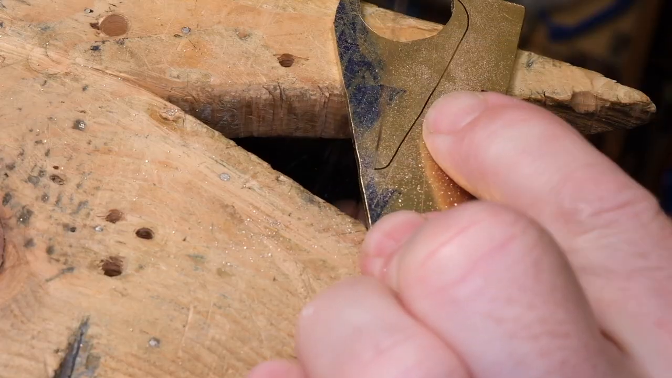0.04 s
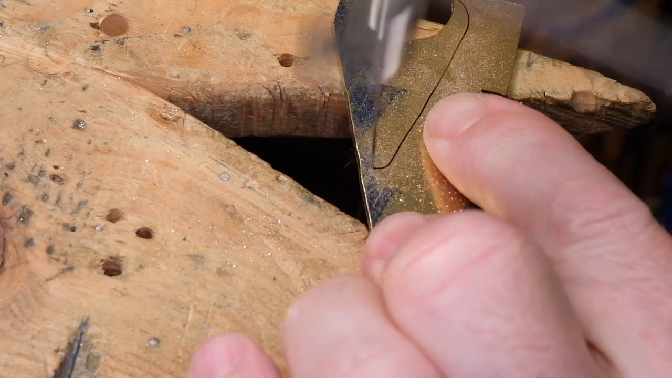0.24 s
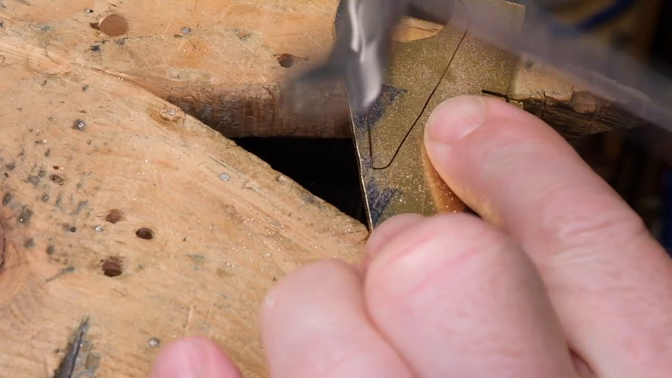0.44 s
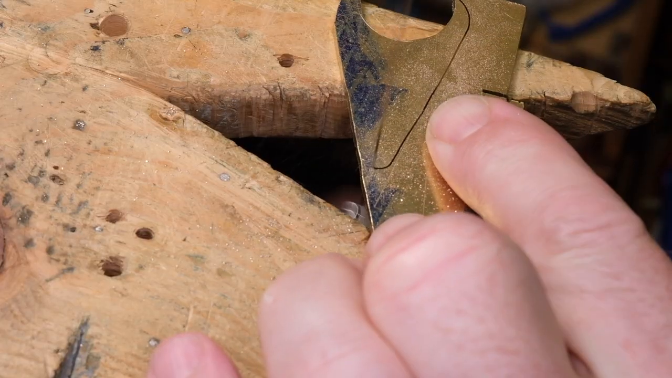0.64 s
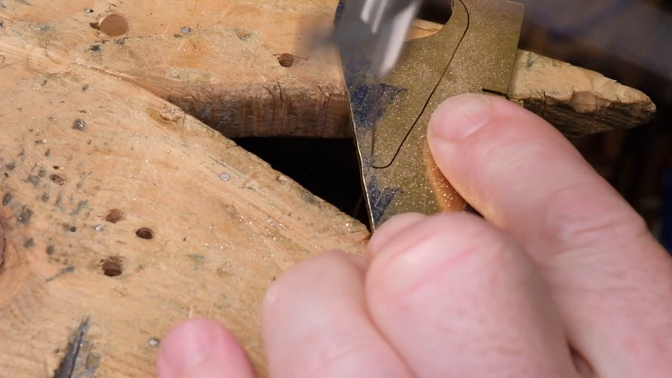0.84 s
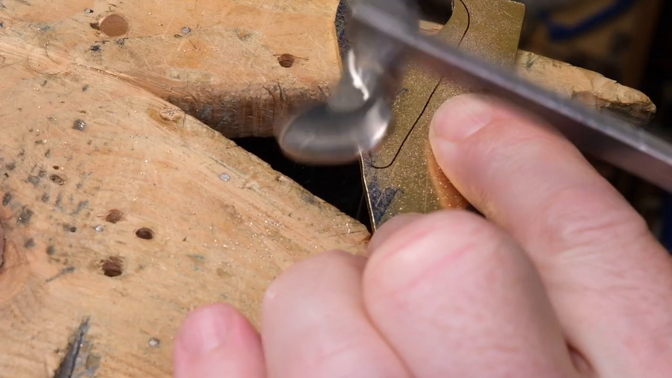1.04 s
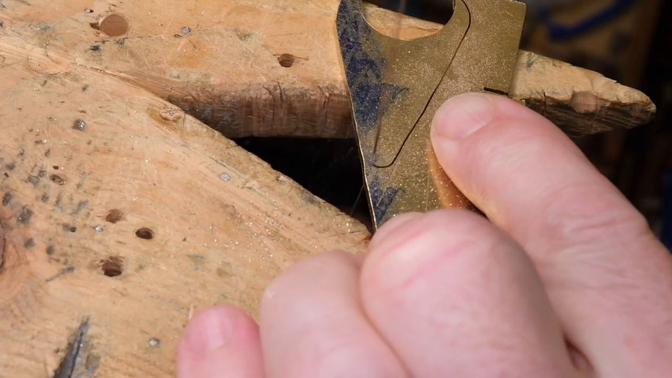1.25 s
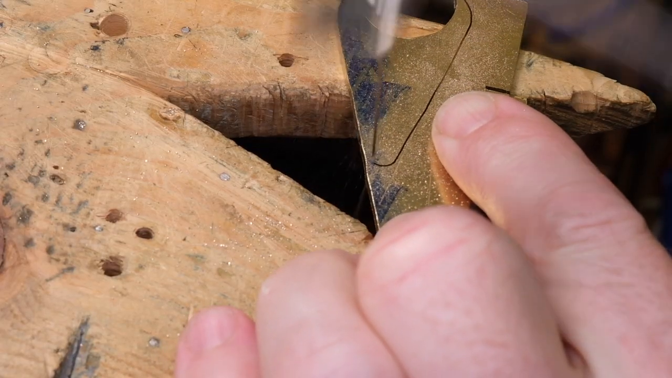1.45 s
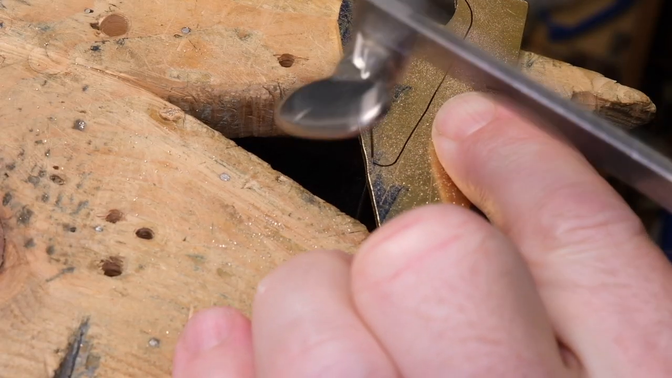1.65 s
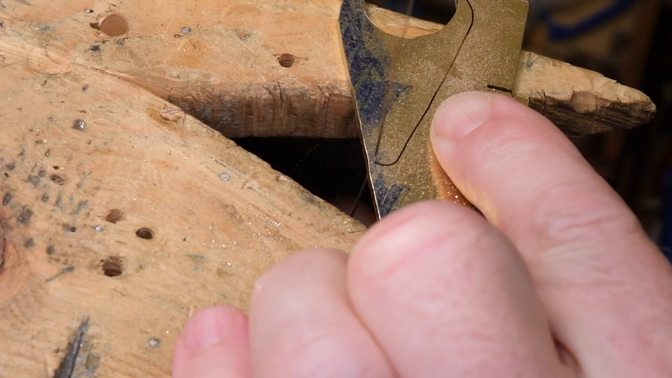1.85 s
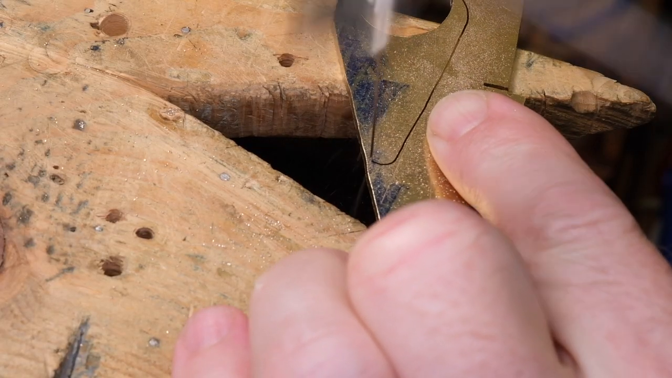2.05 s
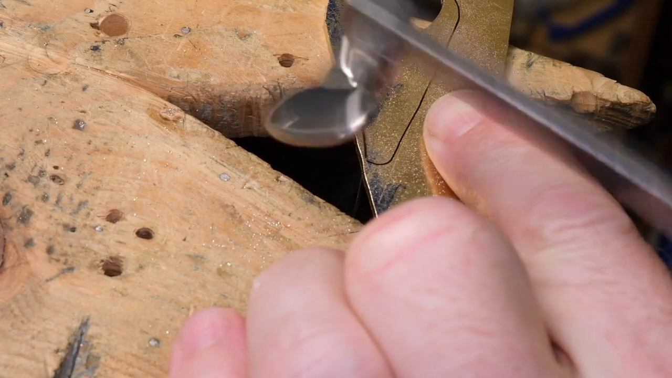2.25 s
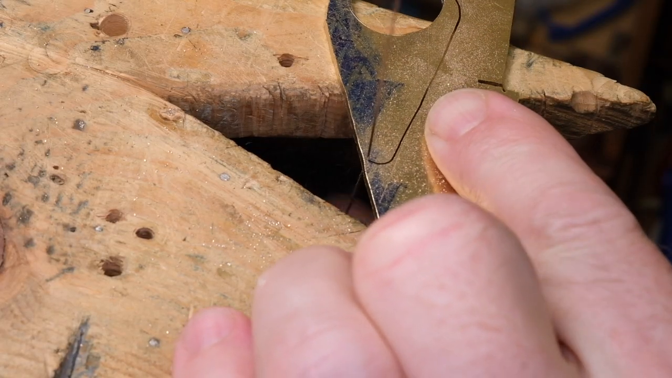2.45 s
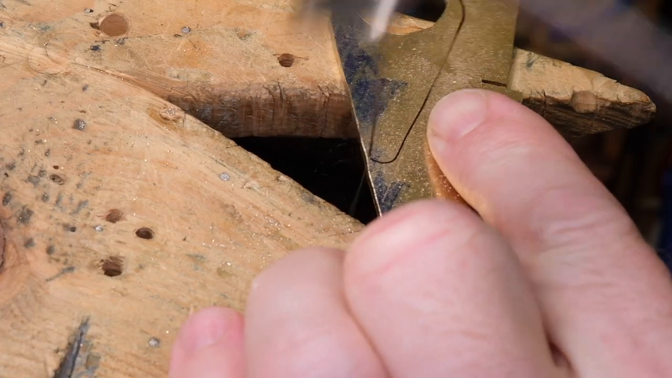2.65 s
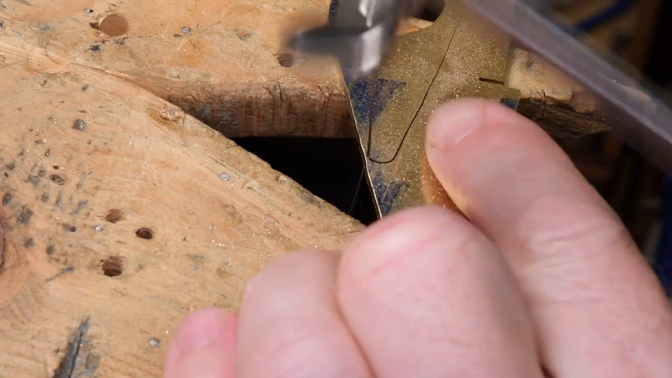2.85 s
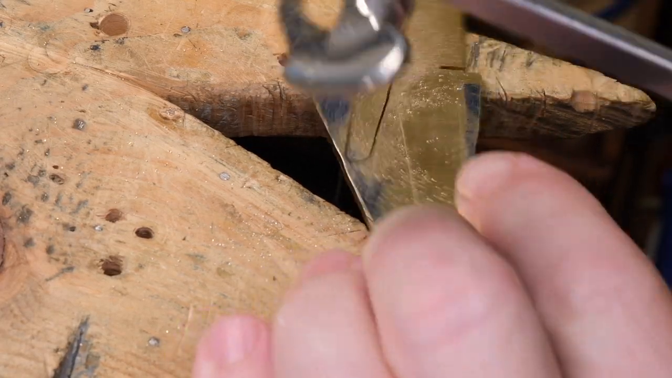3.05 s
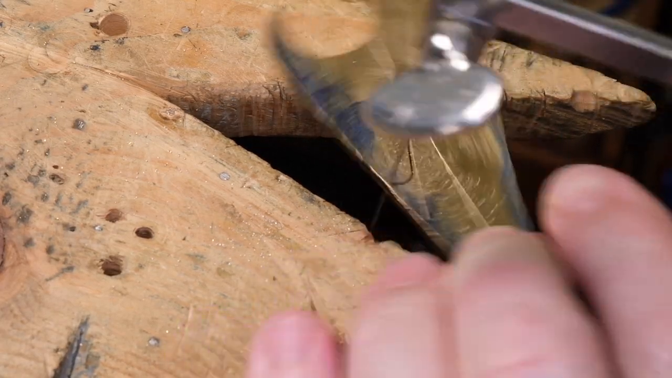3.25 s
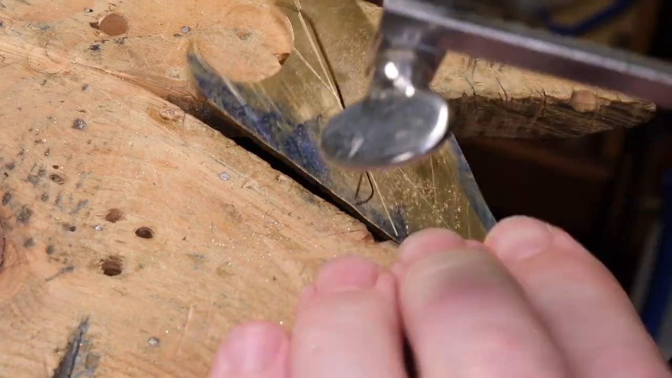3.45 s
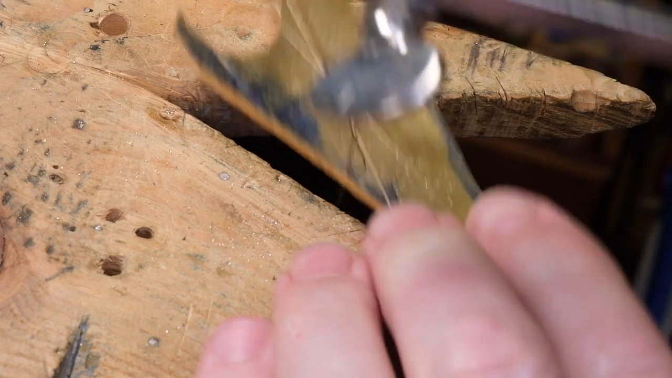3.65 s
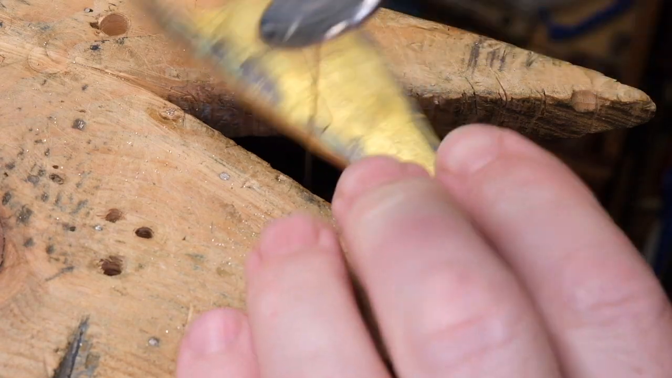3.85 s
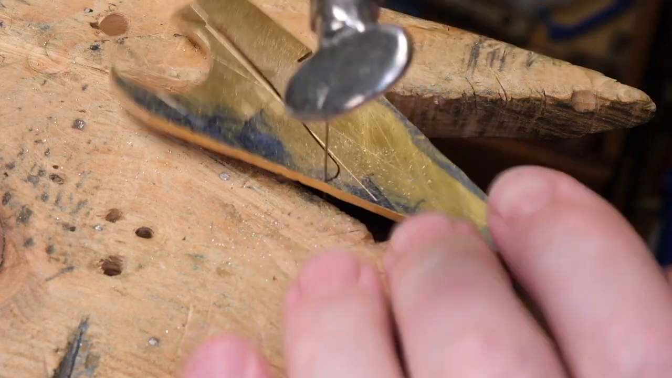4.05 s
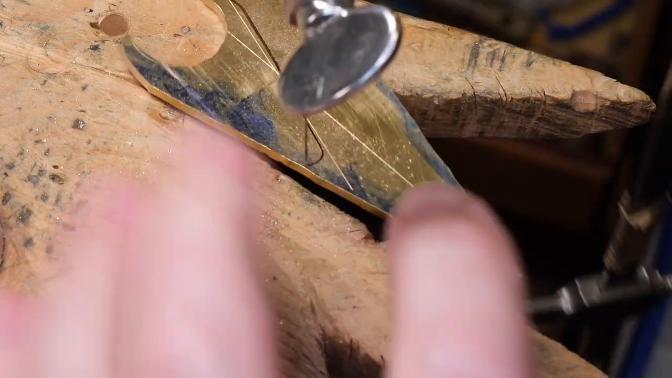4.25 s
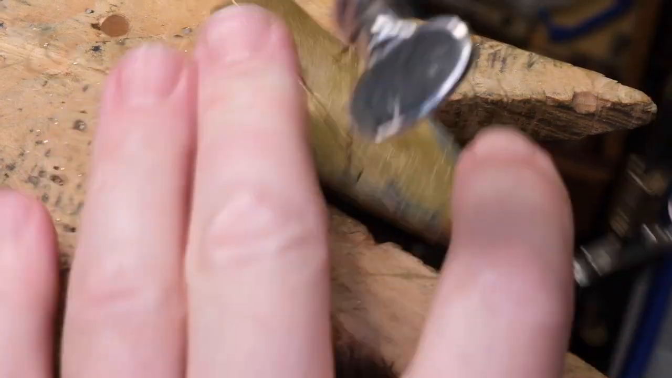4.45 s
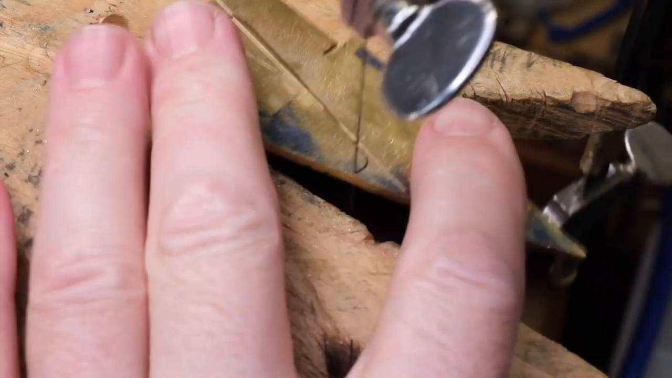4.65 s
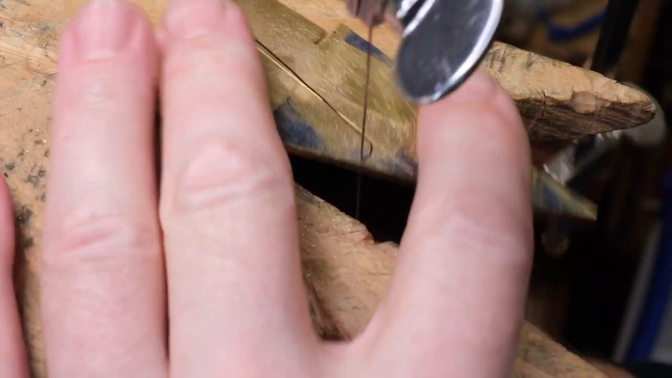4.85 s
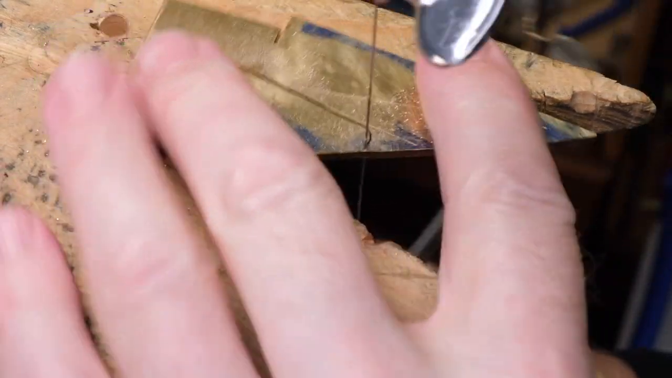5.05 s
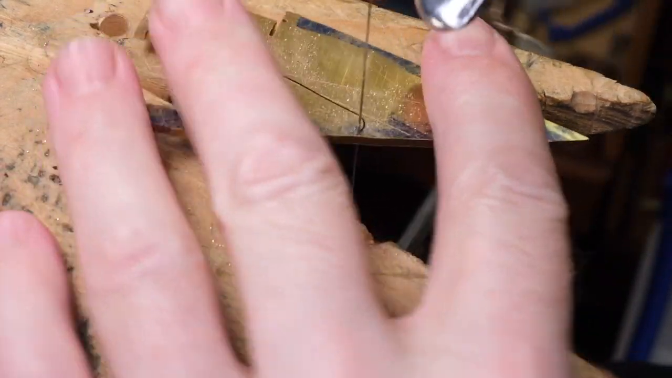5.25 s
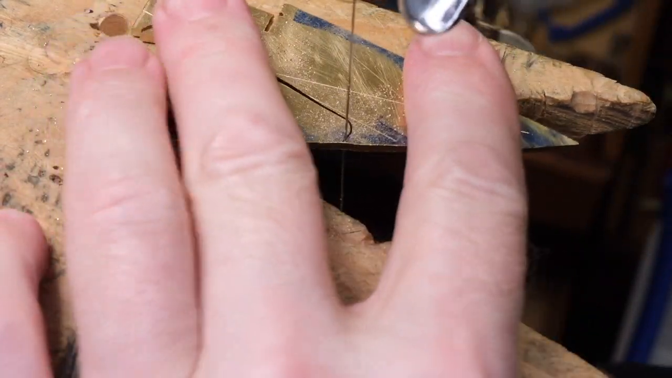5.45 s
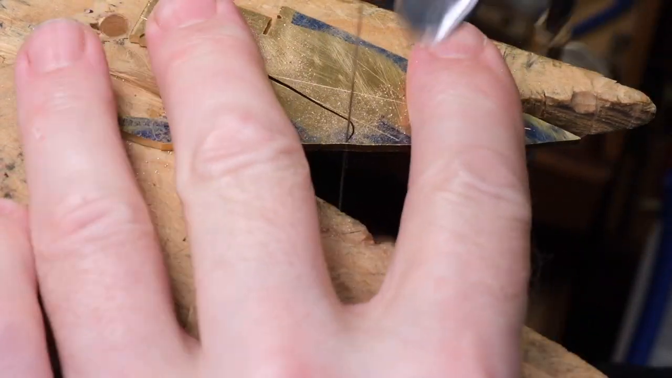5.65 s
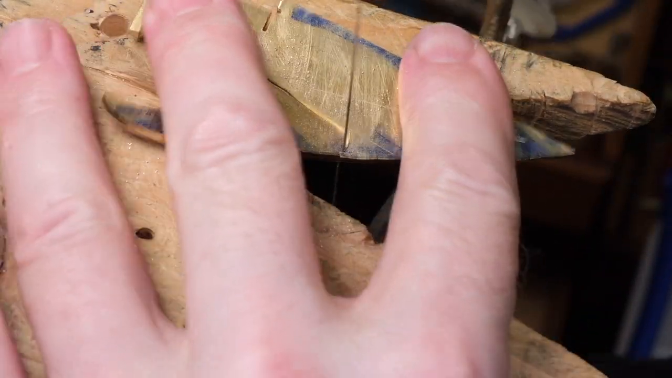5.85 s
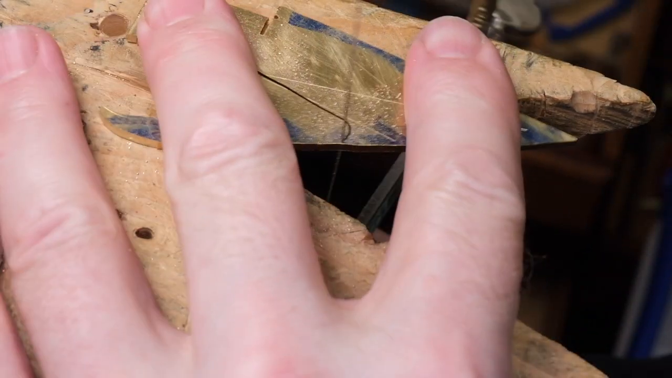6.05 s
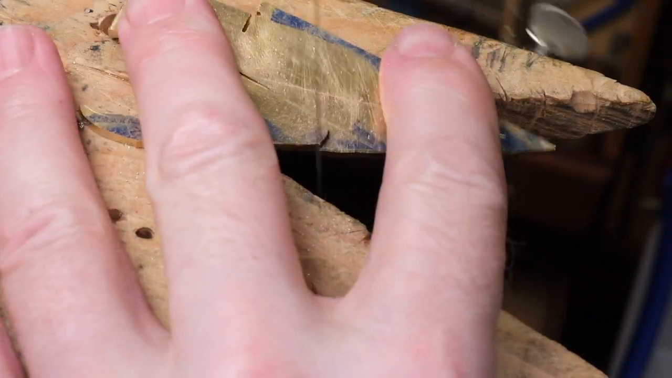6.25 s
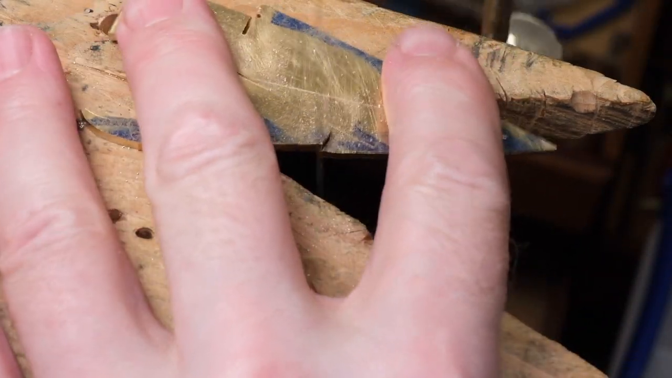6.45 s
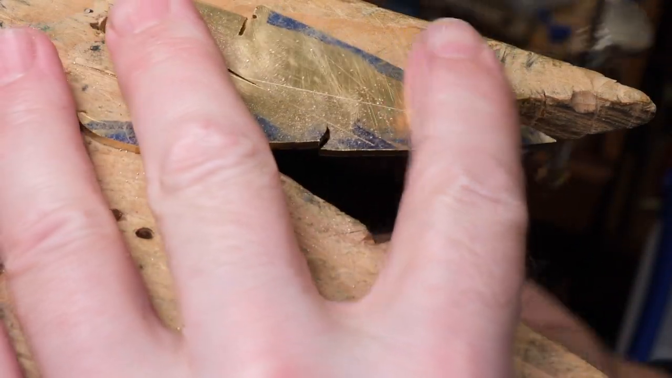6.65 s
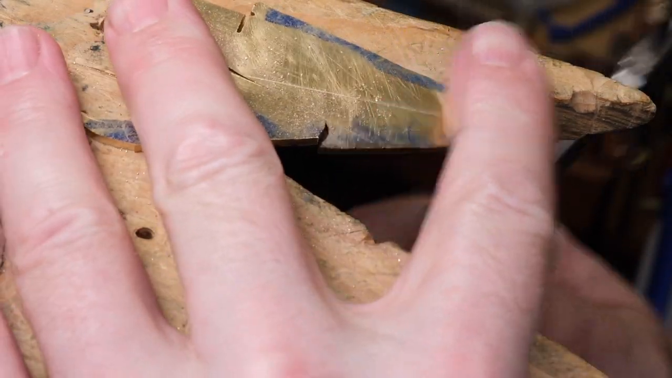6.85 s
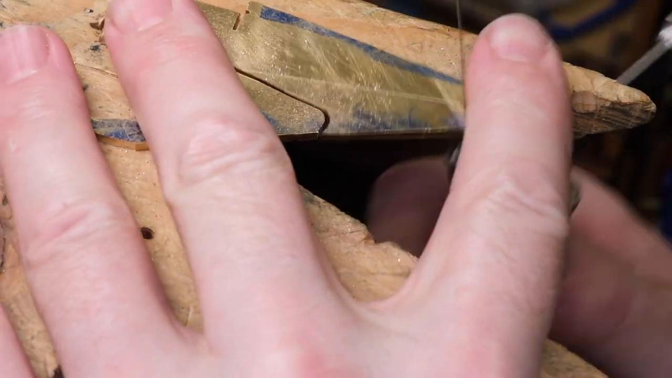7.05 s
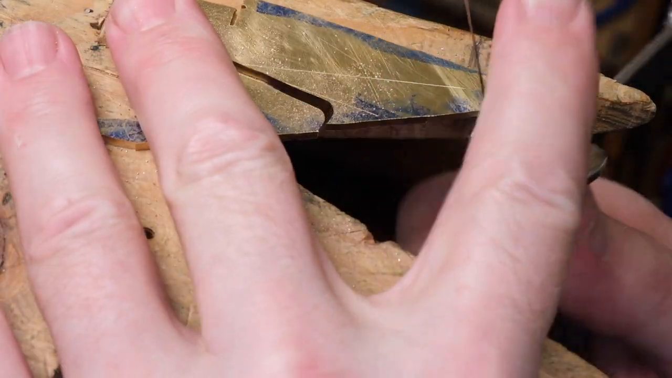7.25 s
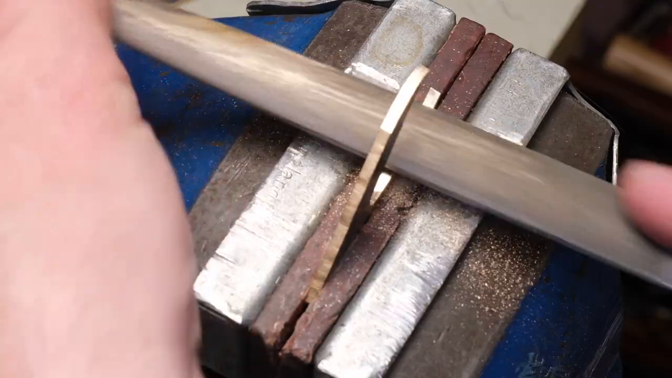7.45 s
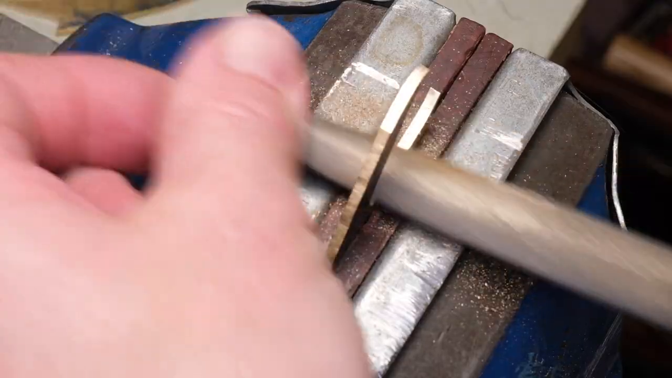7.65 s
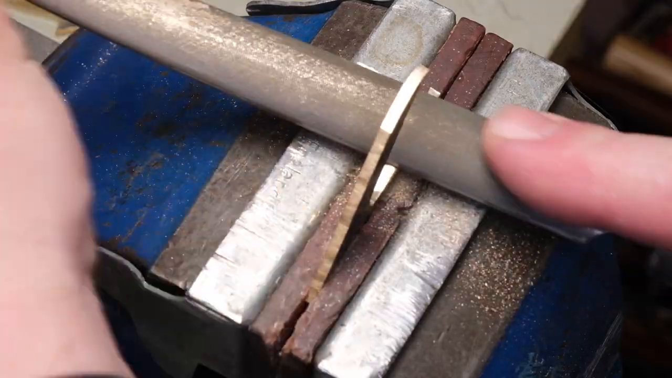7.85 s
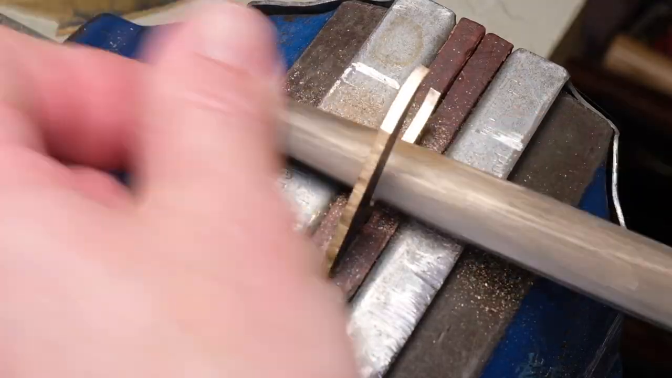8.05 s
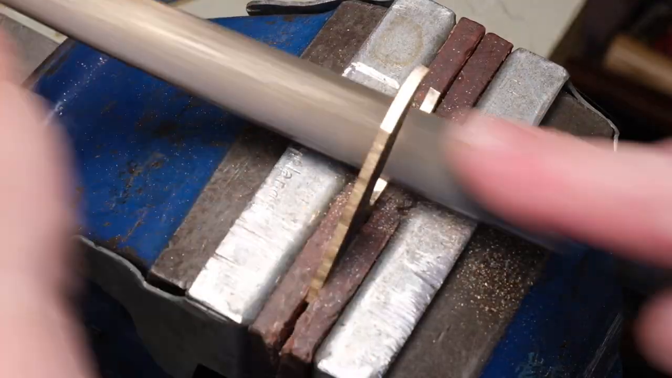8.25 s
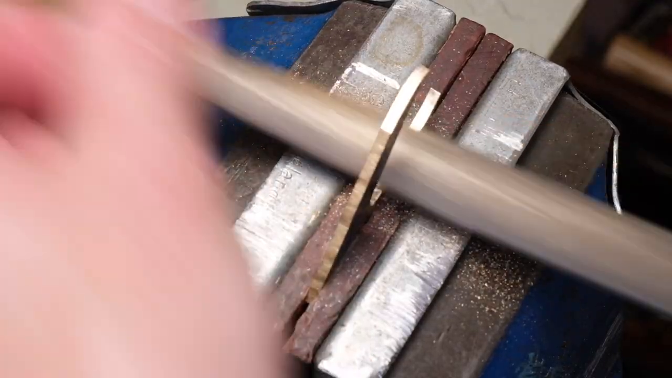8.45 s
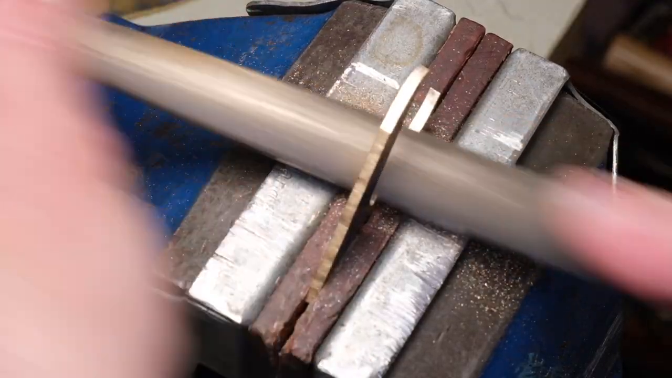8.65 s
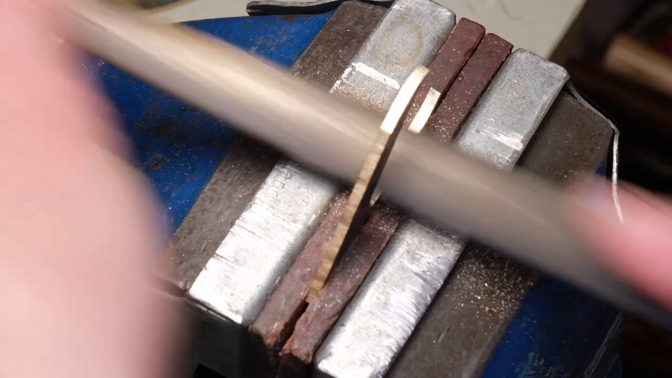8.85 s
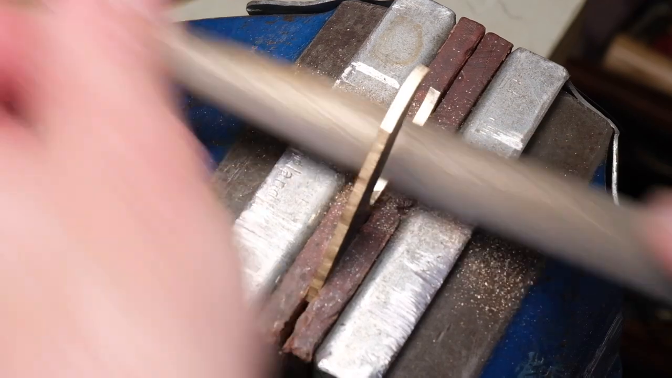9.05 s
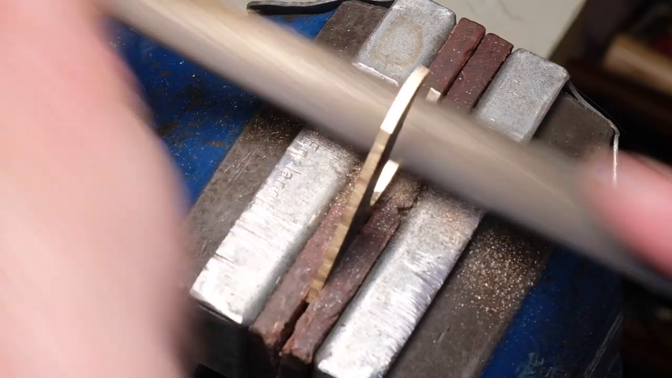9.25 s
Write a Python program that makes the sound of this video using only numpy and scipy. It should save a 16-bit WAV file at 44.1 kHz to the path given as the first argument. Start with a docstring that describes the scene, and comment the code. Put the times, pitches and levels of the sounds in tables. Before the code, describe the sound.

Close stereo perspective at a wooden bench in a small, dull workshop with very quiet low background air. From 0 to about 2.9 seconds a piercing saw works thin brass, roughly 3.3 up-and-down cycles a second: uneven, gritty buzzing that rises and falls in pitch, louder when the saw is high, with a hard clacking jolt at each downstroke and brassy sheet ringing. From 2.9 the sawing ends; the sheet is turned with clacks, wooden thuds, light scuffs and faint dragging, busiest near 3.1-3.4 and 4.7. Knocks at 5.4 and 5.5 lead to a short tearing stroke at 5.6-5.9. At 6.1 the piece snaps free sharply; the steel frame pings softly at 6.3 and 6.4. Small scuffs fade into near quiet. From 7.3 to 9.4 a file scrapes clamped brass in steady strokes around 0.2 seconds each, bright, raspy and hissy with gliding tones; a brief judder at 8.9.

```python
"""Sawing and filing brass in a small workshop

Close at a wooden bench peg, a piercing saw cuts thin brass sheet: uneven tooth bites excite its resonances,
and struck blows jolt it as each downstroke begins. The sheet is turned with knocks and scuffs, a last stroke
tears through, the piece snaps free and the saw frame pings. Then a hand file works brass in a vice, as
shaped noise and a gliding tooth note. Two microphones hear it in a short, dull room over quiet air."""
import sys
import numpy as np
from scipy import signal
from scipy.fft import rfft, irfft
from scipy.io import wavfile
from scipy.ndimage import uniform_filter1d, map_coordinates

SR = 44100
rng = np.random.default_rng(int(sys.argv[2]) if len(sys.argv) > 2 else 0)


def persist_wave(psi):
    """Save psi, clipped to +-1, as 16-bit WAV."""
    counts = np.round(np.clip(psi, -1, 1) * 32767).astype(np.int16)
    wavfile.write(sys.argv[1], SR, np.atleast_2d(counts).T)


N = 410571

# Event levels are those of the loudest 3 ms, before the peg boom and the room.

# quiet background of the workshop: pitch_hz, level_db
AIR_COLOUR = [(15, -46.5), (25, -13.5), (92, 1), (249, -8), (354, -16), (818, -11.5), (1070, -23),
              (1290, -12), (1520, -27), (1740, -16), (5000, -33), (14800, -35), (16000, -38)]
# difference between the two microphones: pitch_hz, side_minus_mid_db
MICROPHONE_WIDTH = [(30, -4.5), (100, -18.5), (600, -12.5), (1200, -14.5), (1800, -11), (2600, -3),
                    (4000, -1.5), (16000, -1)]
# the steel saw frame is struck: start_s, level_db (lowered by 6.5 dB in frame())
FRAME_PINGS = [(6.299, -20.5), (6.409, -34)]
# resonances of the saw frame: pitch_hz, width_hz, level_db
FRAME_RESONANCES = [(1080, 36, -4), (2110, 48, -2), (3020, 25, -8), (3580, 34, -11), (4310, 16, -25),
                    (6280, 34, -14), (9650, 110, -17), (12300, 25, -25), (15100, 19, -11)]
# the sheet knocks on the peg, with more thud the flatter it lands; from 5.358 s, with the sheet held flat, the
# blade ticks in the kerf instead: start_s, level_db, thud_db
SHEET_KNOCKS = [(2.858, -17.5, -8), (3.115, -31.5, 13.5), (3.264, -28, 3), (3.28, -25.5, -4),
                (3.323, -26, 13.5), (3.352, -21.5, 1), (3.401, -21.5, -2.5), (3.44, -36.5, 14),
                (3.928, -31, -10), (4.002, -22.5, 8), (4.181, -48, -22), (4.401, -43, -22),
                (4.719, -34.5, 9.5), (4.739, -31.5, 4), (4.752, -25, -2.5), (5.358, -25, -11.5),
                (5.543, -19.5, -17), (6.061, -25.5, -10), (6.239, -37, -18), (6.438, -37, -18)]
# short scuffs of the sheet on the wood: start_s, level_db
SHEET_SCUFFS = [(2.916, -33), (3.623, -39), (3.834, -40.5), (4.325, -44), (4.571, -45), (4.91, -36.5),
                (4.999, -44), (6.022, -34.5), (6.635, -47), (6.877, -50.5), (7.03, -52.5), (7.098, -47)]
# the sheet dragged round on the wood, before its flutter: time_s, level_db
DRAG_LEVEL = [(2.88, -42.5), (3.1, -53.5), (3.32, -44.5), (3.73, -61.5), (4.11, -55), (4.43, -57.5),
              (4.89, -51), (5.32, -64.5), (5.5, -61)]
# dull bumps on the bench: start_s, level_db
BENCH_BUMPS = [(.645, -30), (7.115, -43)]
# resonances of the brass sheet: pitch_hz, width_hz, level_db
SHEET_RESONANCES = [(177, 7.8, 3), (294.8, 14, 0.5), (581, 33, -3), (679, 8, -4), (1143, 7.9, -14),
                    (1232, 35, -1.5), (1300, 27, -15), (1540, 16, -22.5), (1701.5, 35, 6.5), (1789, 85, -4),
                    (2040, 20, -11), (2720, 19, -10.5), (2874, 43, 3), (3701, 24, 1.5)]
# boom of the peg under all the work done on it: pitch_hz, width_hz, level_db
PEG_RESONANCE = [(182, 24, -2)]
# brass clack of a knock: pitch_hz, level_db
CLACK_COLOUR = [(150, -33.5), (600, -12), (1100, 3.5), (1800, 1.5), (2150, -3), (2700, -31), (6000, -66.5)]
# wooden thud of a knock: pitch_hz, level_db
THUD_COLOUR = [(40, -37.5), (150, -16), (290, 1.5), (440, -6.5), (650, 5), (950, -4), (1600, -47.5),
               (5000, -61.5)]
# crack on top of a knock: pitch_hz, level_db
CRACK_COLOUR = [(1500, -9.5), (2600, -0.5), (3800, -1), (5000, -13), (8000, -17), (13000, -19.5),
                (16000, -16.5)]
# the piece snapping free: pitch_hz, level_db
SNAP_COLOUR = [(100, -28), (350, -4), (800, -2.5), (1250, -2), (2000, 3.5), (2900, -10.5), (3800, -7),
               (5000, -22), (9000, -32), (16000, -38)]
# the bench when shaken: pitch_hz, level_db
BENCH_COLOUR = [(30, -27.5), (70, -14.5), (115, 2), (200, -1), (320, -10), (600, -10), (1500, -42.5)]
# slow last stroke that breaks through, before its flutter: time_s, level_db
LAST_CUT_LEVEL = [(5.595, -55), (5.609, -44), (5.655, -32.5), (5.751, -36), (5.781, -21.5), (5.817, -41),
                  (5.911, -65), (5.92, -62)]
# mean tooth rate of the last stroke: time_s, rate_hz
LAST_CUT_TOOTH_RATE = [(5.6, 221), (5.715, 434.2), (5.8, 484)]
# tearing of the last bridge of brass: pitch_hz, level_db
TEAR_COLOUR = [(35, -50), (60, -10.5), (294, -2.5), (363, -15.5), (540, -2.5), (903, -0.5), (1820, -5.5),
               (2000, 0), (3940, -25.5), (6580, -25), (7750, -34), (12100, -25), (16000, -42)]
# file strokes, push and pull in turn; the lie of the file trades rasp for hiss:
# start_s, force_db, brightness_db
FILE_STROKES = [(7.334, -9.5, -1), (7.451, -1, -1.5), (7.665, 0.5, -0.5), (7.885, 0.5, -0.5),
                (8.11, 0, 1.5), (8.336, 0, 1), (8.549, -.5, 1.5), (8.795, 0, -1), (9, 1, -1.5),
                (9.206, 0, -3)]
# the file judders once: time_s, level_db
JUDDER_LEVEL = [(8.88, -87), (8.905, -30), (8.92, -25.5), (8.95, -33.5), (8.99, -42.5), (9.03, -64)]
# colour of the judder: pitch_hz, level_db
JUDDER_COLOUR = [(200, -16.5), (600, -13), (880, 3.5), (1100, -8), (1600, -21), (4000, -45.5)]
# resonances of the brass clamped in the vice: pitch_hz, width_hz, level_db
VICE_RESONANCES = [(924, 51, 2.5), (1096, 15, 3.5), (2082, 19, 6.5), (3960, 170, -28), (4430, 21, 14.5),
                   (4710, 41, 16.5), (9070, 180, 4), (10590, 73, 13), (12040, 45, -1), (14360, 25, -6),
                   (14715, 58, -6)]
# rasp of the file: pitch_hz, level_db
FILE_RASP_COLOUR = [(120, -6.5), (400, -1.5), (900, 1.5), (1700, -1.5), (2400, 2.5), (3000, -1.5),
                    (3600, 8), (4600, -6), (5400, -16), (8000, -11.5), (12000, -23)]
# hiss of the file: pitch_hz, level_db
FILE_HISS_COLOUR = [(5000, -17.5), (8000, -19.5), (9000, -16), (9900, -13), (10600, -13), (11500, -17.5),
                    (12600, -17), (14000, -3.5), (14700, -2.5), (15500, -5), (16000, -6)]
# the saw teeth catch just after the upper turn, then jolt the sheet: start_s, jolt_level_db
SAW_STROKES = [(.072, -9), (.380, -7.5), (.663, -9.5), (.957, -8.5), (1.257, -11.5), (1.560, -8),
               (1.858, -9), (2.159, -12), (2.463, -12), (2.769, -8)]
# the blade snags hard a few times: start_s, level_db, thud_db (thud lowered by 4 dB on the peg)
BLADE_SNAGS = [(.292, -12.5, -23), (.424, -7.5, -19), (.626, -9.5, -0.5), (1.514, -12.5, -25),
               (2.422, -11, -23.5), (2.710, -10.5, -28)]
# effort of the sawing hand, easing off at the end: time_s, effort_db
SAWING_EFFORT = [(0, .5), (2.55, -0.5), (2.75, -2), (2.93, -15.5)]
# rasp of the saw: pitch_hz, level_db
SAW_RASP_COLOUR = [(40, -51), (90, -21.5), (180, -24), (450, -18.5), (700, -13), (1050, 0), (1450, -4),
                   (1800, -1.5), (2300, -18.5), (3200, -19.5), (4200, -26.5), (5500, -35), (9000, -62.5)]
# hiss of the saw: pitch_hz, level_db
SAW_HISS_COLOUR = [(1500, -19), (3000, 0), (4200, 11), (5600, -4), (6700, 8), (7700, -11.5), (9000, 2.5),
                   (10200, 3), (11000, 3.5), (13400, 6), (14200, -2.5), (16000, -21.5)]
# tongue of brass being cut free: pitch_hz, width_hz, level_db (at the start)
TONGUE_RESONANCE = [(1266, 28, -13)]

AIR_DB, ROOM_T60_S = -56.5, 0.44
RECORDER_TOP_HZ = 15800
SNAP_S, SNAP_DB = 6.119, -8
PRESSED_FLAT_S = 5.2  # from here the sheet is held flat and rings less
RATTLE_S, RATTLE_DOUBLES_DB = 0.0085, 12.5  # a knock rattles twice as long for this much more thud
SCUFF_S, SCUFF_THUD_DB, SCUFF_CRACK_DB = 0.026, 2.5, -10
FILE_END_S = 9.42
# base levels of the file: (push, pull)
FILE_RASP_DB, FILE_HISS_DB, FILE_RUMBLE_DB = (-38, -38), (-32, -31.5), (-45.5, -51)
STROKE_S = .143  # from the upper turn of the saw down to the lower
CATCH_AFTER_TURN_S, JOLT_AFTER_CATCH_S = .011, .021
# catch before effort; the thuds are lowered by 4 dB on the peg
CATCH_DB, CATCH_THUD_DB, JOLT_THUD_DB = -14.5, -8.5, -9
# lesser snags before and after the upper turn: distance, scatter, level before effort, thud as above
SNAG_FROM_TURN_S, SNAG_SCATTER_S, SNAG_DB, SNAG_THUD_DB = (-.033, 0.047), .007, -19, -26.5
# the two directions of the saw: (up, down)
TOOTH_HZ = (1150, 1349.4)  # mean tooth rate at full speed
RASP_DB, HISS_DB = (-11.5, -11.5), (-42.5, -42)  # base levels, before effort and height
LOW_SAW_DROP_DB = (9, 6.5)  # how much quieter the rasp is with the saw low
ROCKING_DB = (2, -5)  # base strength of the rocking note
TONGUE_DB_PER_S = 6  # the tongue rings more as the cut grows
GRIP, GRIP_S = .85, .024  # extra bite as the teeth catch, and how fast it eases


def undb(db):
    """Decibels to gain."""
    return np.exp(np.asarray(db) * (np.log(10) / 20))


def unit(x):
    """Scale to rms 1."""
    return x / np.sqrt(np.mean(x ** 2) + 1e-20)


def gain_curve(rows):
    """A level curve as a gain for every sample; all but silent outside it."""
    times, levels_db = np.transpose(rows)
    return undb(np.interp(np.arange(N) / SR, times, levels_db, left=-150, right=-150))


def wander(rate, size=N):
    """Smooth chance with spread near 1, drawn at the given rate in Hz."""
    knots = rng.standard_normal(size // 8)
    place = np.arange(size) * (rate / SR)
    k = place.astype(int)
    return 1.2 * (knots[k] + (place - k) * np.diff(knots)[k])


def colour(x, points, size=2048):
    """Causal minimum-phase filter with the given spectrum."""
    hz, db = np.transpose(points)
    bins = np.maximum(np.fft.rfftfreq(size, 1 / SR), 1)
    gain = undb(np.interp(np.log(bins), np.log(hz), db))
    cepstrum = irfft(np.log(gain))
    # folding the cepstrum puts the energy as early as it can be
    cepstrum[1:size // 2] *= 2
    cepstrum[size // 2 + 1:] = 0
    response = irfft(np.exp(rfft(cepstrum)))
    return signal.oaconvolve(x, response)[:len(x)]


def ring(x, modes):
    """The sum of an object's resonances."""
    return sum(undb(db) * signal.lfilter(*signal.iirpeak(hz, hz / width, fs=SR), x)
               for hz, width, db in modes)


def shifting_ring(x, modes, shift_db=3.5, size=64):
    """The contact point travels, so each resonance comes and goes."""
    out = np.zeros(N)
    for mode in modes:
        shift = undb(shift_db * (wander(10 * size, size=N // size + 1) - .5))
        out += ring(x, [mode]) * np.repeat(shift, size)[:N]
    return out


def add(track, s, sound, db):
    """Place a sound so that its loudest 3 ms have the given level."""
    start = max(int(s * SR), 0)
    peak = np.sqrt(uniform_filter1d(sound ** 2, size=130).max())
    track[start:start + len(sound)] += (sound * undb(db) / peak)[:N - start]


def grit(spread_db, size=N):
    """Dense tiny fractures, a few much larger than the rest."""
    sizes_db = spread_db * np.minimum(rng.exponential(size=size), 5)
    return unit(rng.standard_normal(size) * undb(sizes_db))


def impact(rattle, rattle_s, size=14000):
    """One blow, then tiny rebounds that die away."""
    force = rattle * grit(2.4, size=size) * np.exp(-np.arange(size) / SR / rattle_s)
    force[0] += 1
    return force


def hand(starts, end_s, lean):
    """Back and forth motion: stroke number, height 0-1 and speed 0-1; lean sharpens the upper turn."""
    travel = np.interp(np.arange(N) / SR, np.append(starts, end_s), np.arange(len(starts) + 1))
    stroke = np.minimum(travel.astype(int), len(starts) - 1)
    angle = np.pi * travel
    height = (1 - np.cos(angle)) / 2
    speed = np.abs(np.sin(angle - lean * np.sin(angle)))
    return stroke, height, speed


def air():
    """The quiet background of the workshop: coloured noise, partly separate at the two microphones."""
    mid, side = (unit(colour(rng.standard_normal(N), AIR_COLOUR)) for _ in range(2))
    side = undb(4.0) * colour(side, MICROPHONE_WIDTH)
    return undb(AIR_DB) * np.array([mid + side, mid - side])


def workshop(x, room_db=-21, near_db=-15, size=22000):
    """Quick bench reflections and a short, dull tail; the treble reaches each microphone differently."""
    t = np.arange(size) / SR
    near = rng.standard_normal(size) * np.exp(-t / 0.011) * (t > .001)
    tail = rng.standard_normal(size) * undb(-60 * t / ROOM_T60_S) * (t > .007)
    tail = colour(tail / np.linalg.norm(tail), [(4000, 6.5), (14000, -6.5)])
    reflections = undb(near_db) * near / np.linalg.norm(near) + undb(room_db) * tail
    mid = x + signal.oaconvolve(x, reflections)[:N]
    scatter = rng.standard_normal(size) * np.exp(-t / .014)
    scattered = signal.oaconvolve(mid, scatter / np.linalg.norm(scatter))[:N]
    side = colour(scattered, MICROPHONE_WIDTH)
    return np.array([mid + side, mid - side])


def frame(sag=0.19, size=12000):
    """The freed saw frame touches the work and rings, wavering and sagging as the blade slackens."""
    out, t = np.zeros(N), np.arange(size) / SR
    for s, db in FRAME_PINGS:
        force = impact(rattle=0.072, rattle_s=0.028, size=size)
        # reading the ring ever more slowly bends its pitch down
        place = SR * (t - sag * t ** 2) + 0.013 * np.cumsum(wander(230, size=size))
        twang = map_coordinates(ring(force, FRAME_RESONANCES), [place])
        touch = undb(-18) * colour(force, TEAR_COLOUR) + undb(-32.5) * colour(force, SAW_HISS_COLOUR)
        add(out, s, twang + touch, db - 6.5)
    return out


def knock(force, thud_db, crack_db, ring_db, damping):
    """The sheet strikes the peg: brass clack, wooden thud, crack on top; less damping rings longer."""
    blow = colour(force, CLACK_COLOUR)
    blow = blow + undb(thud_db) * colour(force, THUD_COLOUR)
    blow = blow + undb(crack_db) * colour(force, CRACK_COLOUR)
    modes = [(hz, width * damping, db) for hz, width, db in SHEET_RESONANCES]
    return blow + undb(ring_db) * ring(blow, modes)


def drag():
    """Friction of the sheet on the wood: gritty noise through the knock colours and the sheet's ring."""
    friction = grit(5)
    scrape = colour(friction, CLACK_COLOUR)
    scrape = scrape + undb(8) * colour(friction, THUD_COLOUR)
    scrape = scrape + undb(-10) * colour(friction, CRACK_COLOUR)
    scrape = unit(scrape + undb(4.5) * ring(scrape, SHEET_RESONANCES))
    return scrape * gain_curve(DRAG_LEVEL) * undb(3.7 * wander(27))


def sheet(free_damping=0.72, free_ring_db=9, held_ring_db=-4, crack_db=-21):
    """Knocks, scuffs and dragging as the sheet is turned, ticks of the blade once it is held flat, the snap as
    the piece comes free, and bumps."""
    out = np.zeros(N)
    contacts = [(s, db, thud_db, crack_db, RATTLE_S * 2 ** (thud_db / RATTLE_DOUBLES_DB))
                for s, db, thud_db in SHEET_KNOCKS]
    contacts += [(s, db, SCUFF_THUD_DB, SCUFF_CRACK_DB, SCUFF_S) for s, db in SHEET_SCUFFS]
    for s, db, thud_db, edge_db, rattle_s in contacts:
        ring_db, damping = (free_ring_db, free_damping) if s < PRESSED_FLAT_S else (held_ring_db, 1.)
        force = impact(rattle=0.14, rattle_s=rattle_s)
        add(out, s, knock(force, thud_db, edge_db, ring_db, damping), db)
    add(out, SNAP_S, colour(impact(rattle=0.28, rattle_s=0.0029), SNAP_COLOUR), SNAP_DB)
    for s, db in BENCH_BUMPS:
        bump = colour(impact(rattle=0.078, rattle_s=0.039), BENCH_COLOUR)
        add(out, s, ring(bump, [(93, 41, 0)]), db)
    return out + drag()


def last_cut():
    """The saw gathers speed and its teeth tear through the last bridge of brass."""
    t = np.arange(N) / SR
    tooth_hz = np.interp(t, *np.transpose(LAST_CUT_TOOTH_RATE)) * (1 + .045 * wander(200))
    teeth = np.cumsum(tooth_hz) / SR
    bites = np.diff(np.floor(teeth), prepend=0) * undb(2 * wander(500))
    bites = unit(bites - uniform_filter1d(bites, size=200))
    tear = colour(grit(5) + 1.2 * bites, TEAR_COLOUR)
    tear = unit(tear + undb(-9) * ring(tear, SHEET_RESONANCES))
    return tear * gain_curve(LAST_CUT_LEVEL) * undb(1.4 * wander(180))


def file(tooth_hz=3900, note_db=-9, ease_db=6, vice_ring_db=1, hiss_force=3.5, rumble_force=0.32):
    """Fine teeth scrape and ring the clamped brass, brighter when fast and hard; the vice shakes the bench."""
    starts, forces_db, brightness_db = np.transpose(FILE_STROKES)
    stroke, _, speed = hand(starts, FILE_END_S, lean=0)
    t, pull = np.arange(N) / SR, stroke % 2
    force_db, bright_db = forces_db[stroke], brightness_db[stroke]
    # the hand presses hardest early in a stroke
    length_s = np.diff(starts, append=FILE_END_S)[stroke]
    progress = np.clip((t - starts[stroke]) / length_s, 0, 1)
    pressure = undb(ease_db * (.5 - progress) + 1.47 * wander(120))

    rasp, hiss = colour(grit(2.6), FILE_RASP_COLOUR), colour(grit(1.8), FILE_HISS_COLOUR)
    rasp = unit(rasp + undb(vice_ring_db) * shifting_ring(rasp, VICE_RESONANCES))
    hiss = unit(hiss + undb(vice_ring_db) * shifting_ring(hiss, VICE_RESONANCES))
    note_hz = tooth_hz * speed ** 0.43 * (1 + 0.04 * wander(900) + 0.066 * wander(14))
    note = np.sin(2 * np.pi * np.cumsum(note_hz) / SR)

    rasp_gain = undb(np.take(FILE_RASP_DB, pull) + force_db - bright_db)
    rasp = (rasp + undb(note_db) * note) * rasp_gain * (0.056 + speed ** 1.27)
    hiss_gain = undb(np.take(FILE_HISS_DB, pull) + hiss_force * force_db + bright_db)
    hiss = hiss * hiss_gain * (0.037 + speed ** 1.67)
    rumble_gain = undb(np.take(FILE_RUMBLE_DB, pull) + rumble_force * force_db)
    rumble = unit(colour(grit(1.9), BENCH_COLOUR)) * rumble_gain * (1.02 + speed)
    judder = unit(colour(grit(3.3), JUDDER_COLOUR)) * gain_curve(JUDDER_LEVEL)
    filing = uniform_filter1d((t > starts[0]) * 1., size=600)
    return ((rasp + hiss) * pressure + rumble) * filing + judder


def snags(bench_db=-14):
    """Strokes catch and jolt the sheet, with lesser snags round the turn; the peg shakes the bench."""
    out, blows = np.zeros(N), list(BLADE_SNAGS)
    effort = np.transpose(SAWING_EFFORT)
    for (s, jolt_db), chance in zip(SAW_STROKES, rng.standard_normal((len(SAW_STROKES), 2))):
        lesser = s - CATCH_AFTER_TURN_S + np.array(SNAG_FROM_TURN_S) + SNAG_SCATTER_S * chance
        blows += [(at, SNAG_DB + np.interp(at, *effort), SNAG_THUD_DB) for at in lesser]
        blows.append((s, CATCH_DB + np.interp(s, *effort), CATCH_THUD_DB))
        blows.append((s + JOLT_AFTER_CATCH_S, jolt_db, JOLT_THUD_DB))
    for s, db, thud_db in blows:
        force = impact(rattle=0.26, rattle_s=0.0049)
        add(out, s, knock(force, thud_db - 4, crack_db=-24, ring_db=3.5, damping=1.), db)
        add(out, s, colour(force, BENCH_COLOUR), db + thud_db + bench_db)
    return out


def saw_turns():
    """Times at which the saw turns round: bottom, top, bottom and so on."""
    tops = np.array(SAW_STROKES)[:, 0] - CATCH_AFTER_TURN_S
    return np.append(tops[0] - STROKE_S, np.column_stack([tops, tops + STROKE_S]))


def tooth_bites(teeth, bite_db):
    """Every tooth lets go of its chip at its own moment and with its own force."""
    chips = np.maximum.accumulate(np.abs(teeth + .25 * wander(1200))).astype(int)
    forces = undb(bite_db * rng.standard_normal(N // 8))
    return np.diff(chips, prepend=0) * forces[chips]


def saw(bite_db=4.0, chips_db=-1, flutter_db=3.0, idle=0.18, lean=.2, octave_db=-10, hiss_lift_db=3.2,
        hiss_effort=1.4):
    """Teeth bite at a rate that follows the hand; the sheet is looser and louder when the saw is high."""
    t, turns = np.arange(N) / SR, saw_turns()
    stroke, height, speed = hand(turns[:-1], turns[-1], lean)
    down, sawing = stroke % 2, t < turns[-1]
    effort_db = np.interp(t, *np.transpose(SAWING_EFFORT))
    teeth = np.cumsum(np.take(TOOTH_HZ, down) * speed * (1 + .045 * wander(250))) / SR

    bites = tooth_bites(teeth, bite_db)
    body = colour(bites / np.std(bites[sawing]) + undb(chips_db) * grit(3.1), SAW_RASP_COLOUR)
    body = body - uniform_filter1d(body, size=600)  # takes out the slow drift
    body = body + undb(4.5) * shifting_ring(body, SHEET_RESONANCES)
    tongue_gain = undb(TONGUE_DB_PER_S * np.minimum(t, turns[-1]))
    body = body + shifting_ring(body, TONGUE_RESONANCE) * tongue_gain

    # riding over the teeth rocks the lifted sheet: a broken, gliding note, clearest late on the way up
    rocking = undb(np.take(ROCKING_DB, down) + 4 * wander(70))
    rocking = rocking * np.minimum(1.6 * height, 1) ** 2 * speed ** 1.6
    note = np.sin(2 * np.pi * teeth) + undb(octave_db) * np.sin(2 * np.pi * 2 * teeth)

    low_drop_db = np.take(LOW_SAW_DROP_DB, down) * (1.5 - height ** 2)
    loose = undb(np.take(RASP_DB, down) + effort_db - low_drop_db + flutter_db * wander(130))
    caught_s = t - turns[stroke] - CATCH_AFTER_TURN_S
    grip = GRIP * down * (caught_s > 0) * np.exp(-np.abs(caught_s) / GRIP_S)
    rasp = (body / np.std(body[sawing]) + note * rocking) * loose * (idle + speed + grip)

    # each tooth also scrapes, with a puff of hiss
    puffs = 1 + 0.68 * np.cos(2 * np.pi * teeth)
    scrape = unit(colour(grit(2.0) * puffs, SAW_HISS_COLOUR))
    hiss_db = np.take(HISS_DB, down) + hiss_effort * effort_db - hiss_lift_db * (0.5 - height)
    hiss = scrape * undb(hiss_db + 1.8 * wander(70)) * (0.1 + speed ** 1.4)
    return (rasp + hiss) * uniform_filter1d(sawing * 1., size=1500)


def scene():
    """All the work at the bench, heard in the room."""
    on_peg = saw() + snags() + sheet() + last_cut()
    bench_work = on_peg + ring(on_peg, PEG_RESONANCE) + frame() + file()
    return workshop(bench_work) + air()


def record(dry):
    """The recorder clips at full scale and cuts the top."""
    low_pass = signal.ellip(10, .2, 80, RECORDER_TOP_HZ, fs=SR, output="sos")
    return signal.sosfilt(low_pass, np.clip(dry, -1, 1))


dry = scene()
out = record(dry)
persist_wave(out)
```